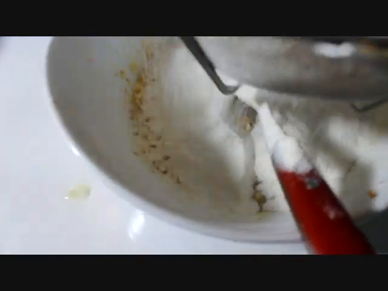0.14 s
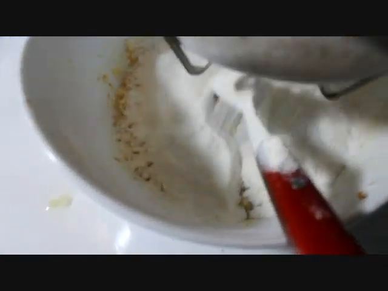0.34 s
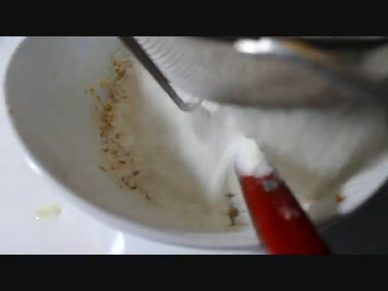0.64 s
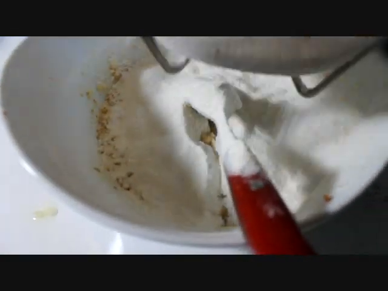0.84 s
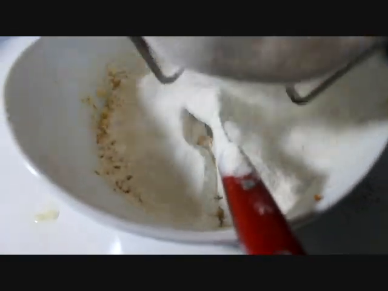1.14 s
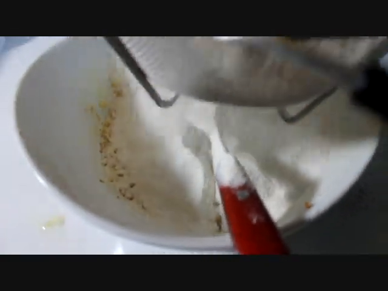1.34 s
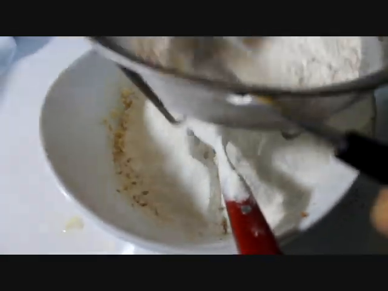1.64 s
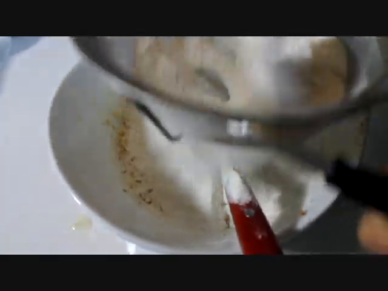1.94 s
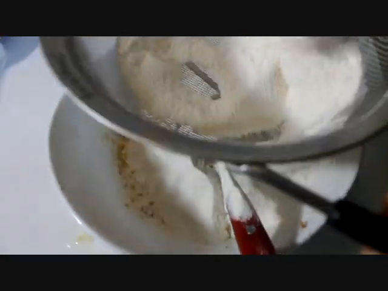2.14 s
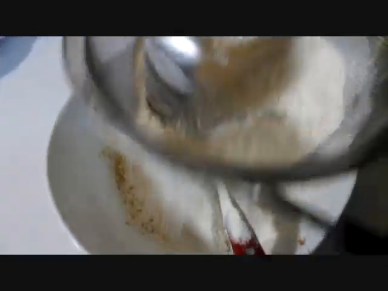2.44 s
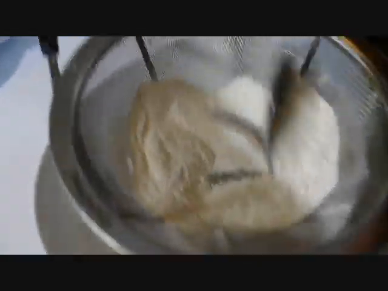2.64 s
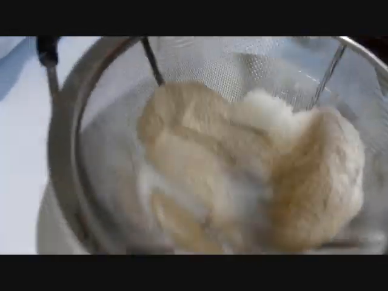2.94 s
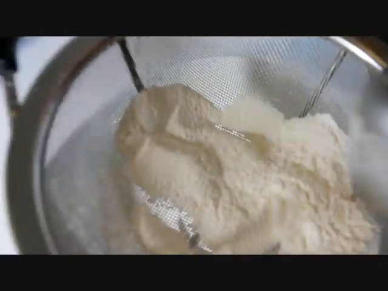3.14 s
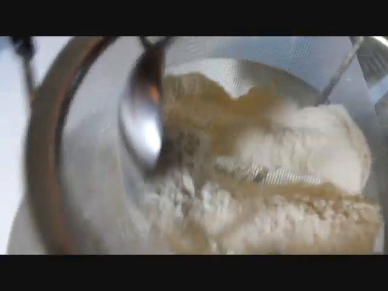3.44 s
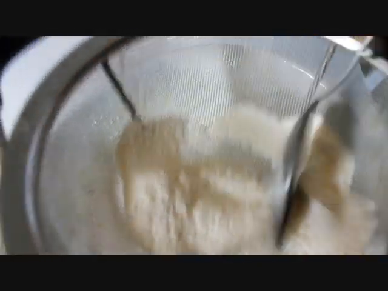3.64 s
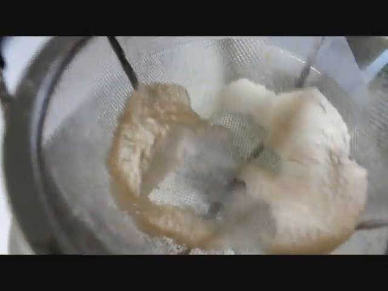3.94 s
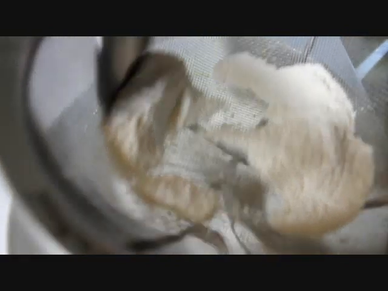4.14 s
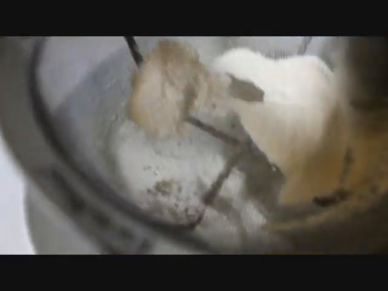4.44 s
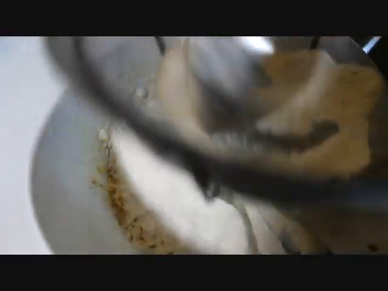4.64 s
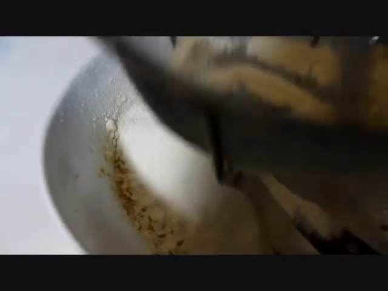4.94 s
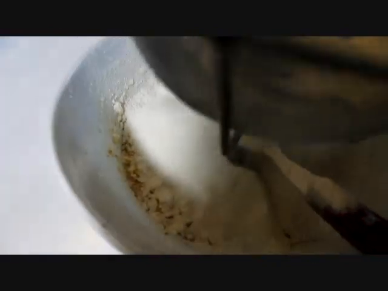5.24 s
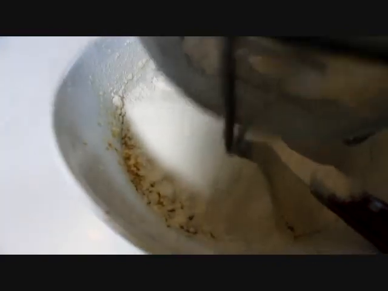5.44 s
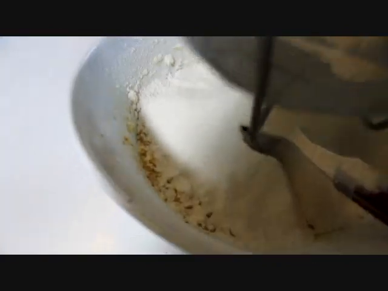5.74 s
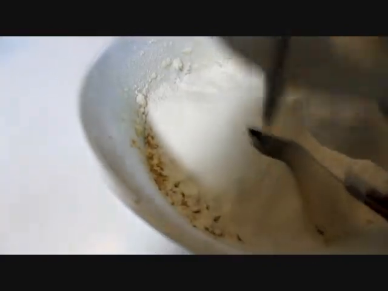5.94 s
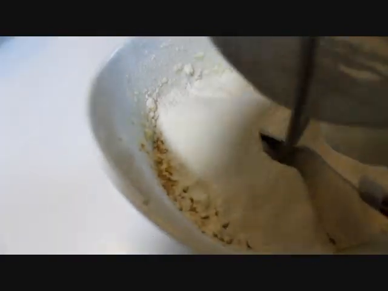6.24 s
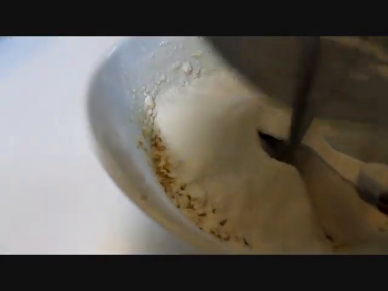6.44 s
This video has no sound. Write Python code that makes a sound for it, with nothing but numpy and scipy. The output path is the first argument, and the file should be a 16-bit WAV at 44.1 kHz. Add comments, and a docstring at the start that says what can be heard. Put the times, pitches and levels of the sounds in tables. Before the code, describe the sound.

Close to the microphone, a metal utensil drags flour across a wire mesh sieve in short, quick rasps. Uneven, lighter scrapes come first, then firmer regular strokes, with clicks as the edge lands and brief buzzes as it crosses the wires. The later strokes turn thinner and brighter. A small kitchen adds faint echo, room noise and a low appliance hum.

```python
"""Small kitchen, microphone close to a wire sieve; room noise and an appliance hum lie behind throughout.
From the start a steel utensil scrapes flour in quick strokes: its edge plucks the wires in random ticks,
which shake the resonances of mesh, bowl and steel. Taps, short buzzes and faint echoes join at once.
Faint narrow hisses fill some pauses from 1.8 s. The top fizz grows until 3.5 s and later eases;
the motor note dips at first and is strongest at the end."""
import sys
import numpy as np
from scipy import signal
from scipy.fft import rfft, irfft
from scipy.io import wavfile
from scipy.ndimage import uniform_filter1d

SR = 44100
rng = np.random.default_rng(int(sys.argv[2]) if len(sys.argv) > 2 else 0)


def unload_wav(signal):
    """Save mono or channel-first audio to the path in sys.argv[1] as 16-bit WAV at rate SR, clipped to [-1, 1]."""
    wavfile.write(
        sys.argv[1],
        SR,
        np.round(np.clip(np.atleast_2d(signal).T, -1, 1) * 32767).astype(np.int16),
    )


def volts_from_decibels(level):
    """Turn decibel levels (scalar or array-like) into linear amplitude factors."""
    exponent = np.asarray(level, float) / 20
    return 10 ** exponent


N = 291060
SECONDS = np.arange(N) / SR
COARSE_STEP = 32  # samples between points of the stroke levels
COARSE_SECONDS = np.arange(0, N + COARSE_STEP, COARSE_STEP) / SR


def evened(x):
    """Scales to rms 1."""
    return x / np.sqrt(np.mean(x ** 2) + 1e-20)


def curve(points, t):
    """Reads a (time, level) table with straight lines between its points."""
    return np.interp(t, *np.transpose(points))


def read(points, hz):
    """Reads a spectrum on a log-frequency axis."""
    f, value = np.transpose(points)
    return np.interp(np.log(hz + 1), np.log(f + 1), value)


def resonate(x, hz, width):
    """One resonance of gain 1 at its centre: a decaying complex rotation."""
    r = np.exp(-np.pi * width / SR)
    return 2 * signal.lfilter([1 - r], [1, -r * np.exp(2j * np.pi * hz / SR)], x).real


def wander(seconds):
    """Slow chance of rms 1 that changes over the given time."""
    size = max(int(seconds * SR), 2)
    smooth = uniform_filter1d(rng.standard_normal(N), size)
    return evened(uniform_filter1d(smooth, size))


def body(x, level, modes):
    """Broad resonances, each passed twice for steep skirts, that swell and fade as the edge moves."""
    swells = [volts_from_decibels(2 * wander(0.013)) for _ in modes]  # 2 dB rms

    def ring(drive):
        total = 0
        for k, (hz, width, db) in enumerate(modes):
            tone = resonate(resonate(drive, hz, width), hz, width)
            total = total + (-1) ** k * volts_from_decibels(db) * swells[k] * tone
        return total

    return ring(x * level) / ring(x).std()


# room noise: (frequency [Hz], relative density [dB])
AIR_SPECTRUM = [(18, -55), (30, -33), (184, 17.5), (740, 10), (988, 7.5), (1810, 3), (2060, 5.5),
                (4300, 2.5), (6720, -6), (8980, -4.5), (12000, -25), (13700, -16), (16000, -25)]
# appliance tones: (frequency [Hz], width of each pass [Hz], level [dB])
HUM_TONES = [(60.3, 8.5, -72.5), (115.3, 22, -63.5), (153, 7.3, -61.5), (193.3, 5.7, -58), (403, 12, -83)]
# motor note before its wavering: (time [s], level [dB])
MOTOR_LEVEL = [(0, -58.5), (2.4, -64), (3.0, -58.5), (6.6, -53.5)]


def background():
    """Steady shaped noise, wavering tones of an appliance and one motor note that dips, then grows."""
    hz = np.fft.rfftfreq(N, 1 / SR)
    air = evened(irfft(rfft(rng.standard_normal(N)) * volts_from_decibels(read(AIR_SPECTRUM, hz)), N))
    shake = rng.standard_normal(N)
    hum = sum(volts_from_decibels(db) * evened(resonate(resonate(shake, f, w), f, w)) for f, w, db in HUM_TONES)
    motor_db = curve(MOTOR_LEVEL, SECONDS) + 0.5 * wander(0.069)
    motor = volts_from_decibels(motor_db) * np.sqrt(2) * np.sin(2 * np.pi * 246.7 * SECONDS)
    return volts_from_decibels(-49) * air + hum + motor


# strokes of the edge over the mesh:
# (fullest contact [s], pressure [dB], swell [s], fade [s], bowl boom against the pressure [dB])
EDGE_STROKES = [(0.025, -25, 0.037, 0.072, -4), (0.126, -32.5, 0.006, 0.031, -0.5),
                (0.188, -37.3, 0.061, 0.07, -4.5), (0.269, -26, 0.054, 0.029, -1.5),
                (0.344, -22, 0.047, 0.019, -4.5), (0.498, -38.5, 0.0056, 0.3, -5),
                (0.597, -25, 0.026, 0.013, -8), (0.664, -25, 0.13, 0.12, -3),
                (0.709, -26, 0.017, 0.015, -2), (0.784, -34.5, 0.22, 0.0083, -5.5),
                (1.021, -37, 0.048, 0.012, -4), (1.08, -17.5, 0.056, 0.088, -14.5),
                (1.148, -34, 0.0052, 0.15, -4.5), (1.261, -20, 0.042, 0.1, -13),
                (1.382, -22.5, 0.036, 0.095, -9.5), (1.512, -18, 0.045, 0.07, -12.5),
                (1.65, -22, 0.07, 0.042, -9), (1.708, -42.1, 0.006, 0.1, -4.5),
                (1.713, -36.6, 0.046, 0.011, -7), (1.917, -36, 0.034, 0.163, -4),
                (1.996, -22, 0.09, 0.22, -5.5), (2.101, -30.5, 0.18, 0.014, -3.5),
                (2.303, -31.5, 0.023, 0.12, -7.5), (2.35, -25.5, 0.034, 0.044, -9),
                (2.387, -31, 0.07, 0.011, -8), (2.513, -38, 0.006, 0.28, -8),
                (2.597, -33.5, 0.028, 0.097, -8), (2.67, -18.0, 0.049, 0.094, -19),
                (2.733, -29, 0.006, 0.078, -12), (3.038, -18.5, 0.026, 0.09, -11.5),
                (3.109, -25, 0.065, 0.015, -9.5), (3.296, -34, 0.0069, 0.043, -0.5),
                (3.374, -19, 0.077, 0.045, -10.5), (3.542, -32.5, 0.0088, 0.071, -12),
                (3.646, -18, 0.055, 0.034, -18), (3.7, -20, 0.034, 0.078, -14),
                (3.824, -21.5, 0.04, 0.073, -17), (3.962, -19.5, 0.062, 0.052, -17),
                (4.071, -16.5, 0.044, 0.051, -31), (4.272, -31, 0.0085, 0.022, -13.5),
                (4.381, -17.5, 0.044, 0.022, -15.5), (4.436, -23, 0.037, 0.074, -14),
                (4.503, -34.8, 0.25, 0.0054, -6.5), (4.632, -27.5, 0.0085, 0.12, -10.5),
                (4.709, -22, 0.078, 0.016, -19), (4.732, -25.5, 0.054, 0.021, -14.6),
                (4.901, -30.5, 0.035, 0.217, -13), (4.973, -19, 0.074, 0.042, -32),
                (5.109, -18.8, 0.04, 0.062, -35), (5.237, -22.1, 0.081, 0.051, -19),
                (5.361, -19.5, 0.059, 0.05, -20), (5.467, -19, 0.058, 0.031, -28),
                (5.72, -20.5, 0.038, 0.012, -33), (5.787, -19, 0.074, 0.05, -38),
                (6.052, -34.5, 0.055, 0.006, -12), (6.114, -20, 0.077, 0.02, -31),
                (6.146, -26, 0.01, 0.021, -31), (6.218, -31.5, 0.046, 0.0099, -23),
                (6.304, -20, 0.069, 0.071, -28), (6.339, -23.8, 0.0078, 0.011, -16),
                (6.458, -20, 0.048, 0.052, -23), (6.557, -22.5, 0.054, 0.058, -18)]
# the edge leaves the mesh: (time [s])
EDGE_LIFTS = [.36, .788, 1.678, 2.113, 2.395, 3.125, 3.415, 4.12, 4.505, 4.75, 5.487, 6.125, 6.6]
ARCH = 1.82  # shape of a stroke: 1 = pointed, 2 = round
LIFT_DB_PER_S = 900  # a stroke still fading is cut short


def contact():
    """Power of each stroke: 20 dB over the swell and the fade, ended quickly when the edge lifts."""
    s, pressure_db, swell, fade, _ = np.transpose(EDGE_STROKES)[:, :, None]
    t = COARSE_SECONDS
    part = np.where(t < s, (s - t) / np.maximum(swell, .003), (t - s) / np.maximum(fade, .003))
    arch_db = 20 * np.minimum(part, 10) ** ARCH
    lift = np.take(EDGE_LIFTS, np.searchsorted(EDGE_LIFTS, s), mode="clip")  # next lift after the stroke
    lift_db = LIFT_DB_PER_S * np.clip(t - lift, 0, .2)
    return volts_from_decibels(pressure_db - arch_db - lift_db) ** 2


# flour drag against the pressure: (time [s], level [dB])
FLOUR_LEVEL = [(0, -3), (.35, 0), (.7, -1), (1.05, -4), (1.4, -5.5), (1.65, -3.5), (2.0, -2), (2.35, -6),
               (2.7, -4), (3.05, -3.5), (3.4, -5), (3.7, -3.5), (3.9, -5.5), (4.4, -3), (4.9, -5),
               (5.4, -5.5), (5.8, -6.5), (6.3, -5.5), (6.6, -5)]
# bare wires against the pressure: (time [s], level [dB])
BARE_WIRE_LEVEL = [(0, -4), (.35, -1), (.7, -3.5), (1.0, -0.5), (1.6, -2), (1.9, -5), (2.4, -8.5),
                   (2.7, -4), (3.1, -7.5), (3.6, -6), (4.0, -5.5), (4.4, -3.5), (4.7, -4), (4.9, 0),
                   (5.4, -0.5), (5.8, 0.5), (6.2, 0.5), (6.6, 1.5)]
# steel ring against the pressure: (time [s], level [dB])
STEEL_LEVEL = [(0, -15), (.9, -17), (1.01, 3), (1.07, -18), (1.7, -11), (2.0, -9), (2.4, -15), (2.6, 0),
               (2.7, -15), (3.1, -25), (3.37, -15), (3.5, -16), (3.55, 9), (3.6, -24), (4.4, -27),
               (4.7, -13), (5.3, -21), (5.65, -14), (5.71, -6), (5.8, -26), (6.1, -10), (6.3, -18),
               (6.44, -4), (6.6, -23)]
# trickle in mesh, bowl, flour drag, bare wires, steel, against the pressure: (level [dB])
TRICKLE_LEVELS = (-17.5, -19.5, -14.5, -19.5, -44)
FIRM_DB = -28  # pressure at which the three slopes below change nothing
BOOM_PER_DB, DRAG_PER_DB, RING_PER_DB = -0.14, -0.16, -0.1  # growth held back [dB per dB of pressure]
TRICKLE_T60 = 0.27  # s


def pressing():
    """Levels that drive mesh, bowl, flour drag, bare wires and steel; flour trickles on after the edge."""
    power = contact()
    whole = power.sum(0)
    over_db = 10 * np.log10(whole + 1e-7) - FIRM_DB
    keep = volts_from_decibels(-120 * COARSE_STEP / SR / TRICKLE_T60)  # power, hence 120
    trickle = signal.lfilter([1 - keep], [1, -keep], whole)
    flour, treble, steel = (volts_from_decibels(curve(points, COARSE_SECONDS)) ** 2
                            for points in (FLOUR_LEVEL, BARE_WIRE_LEVEL, STEEL_LEVEL))
    boom = volts_from_decibels(np.transpose(EDGE_STROKES)[4]) ** 2 @ power
    parts = [whole,
             boom * volts_from_decibels(BOOM_PER_DB * over_db) ** 2,
             whole * flour * volts_from_decibels(DRAG_PER_DB * over_db) ** 2,
             whole * treble,
             whole * steel * volts_from_decibels(RING_PER_DB * over_db) ** 2]
    return [np.interp(SECONDS, COARSE_SECONDS, np.sqrt(part + volts_from_decibels(db) ** 2 * trickle))
            for part, db in zip(parts, TRICKLE_LEVELS)]


def ticks():
    """Wires let go one after another, about 9000 a second, in clumps where the edge chatters."""
    size = volts_from_decibels(0.5 * np.minimum(rng.exponential(1, N), 5)) * rng.choice([-1., 1.], N)
    plucked = rng.random(N) < 9000 / SR
    return evened(size * plucked * volts_from_decibels(wander(.003)))  # clumps vary by 1 dB rms


# colour of the singing wires: (frequency [Hz], relative level [dB])
PING_SPECTRUM = [(700, -20), (1500, -6), (3000, -0.5), (4300, 1.5), (6500, -4.5), (8800, -17), (10500, -1)]


def pings(level):
    """Single wires, plucked hard enough to sing, each ring some cycles on their own pitch."""
    pitches = np.geomspace(700, 10500, num=48) * rng.uniform(0.956, 1.03, size=48)
    plucks = (rng.random(N) < 500 / SR) * volts_from_decibels(4.7 * np.minimum(rng.exponential(1, N), 3))
    which = rng.integers(0, len(pitches), N)

    def ring(drive):
        total = 0
        for k, hz in enumerate(pitches):
            total = total + volts_from_decibels(read(PING_SPECTRUM, hz)) * resonate(drive * (which == k), hz, hz / 22)
        return total

    return volts_from_decibels(-7) * ring(plucks * level) / ring(plucks).std()


# resonances of mesh, flour drag, bowl, knocked rim, bare wires and top fizz:
# (frequency [Hz], width of each pass [Hz], relative level [dB])
MESH_MODES = [(3614, 820, 1), (4170, 1070, 5), (5614, 1780, -2)]
DRAG_MODES = [(1675, 433, -4.5), (2085, 415, 2.5), (2562, 530, -1.5), (3042, 430, 4.5)]
BOWL_MODES = [(478, 486, -9), (710, 160, 0), (968, 275, 3.5), (1426, 440, 6)]
RIM_KNOCK_MODES = [(350, 500, 0), (1000, 900, 0)]
WIRE_MODES = [(7280, 2600, 4), (8800, 2000, 8.5), (10090, 1560, 1)]
FIZZ_MODES = [(11040, 1650, 0), (12600, 1360, -0.5), (13900, 1460, -1), (15300, 1300, -4)]
# lower and upper ring of the steel, then the hoop: (frequency [Hz], width [Hz], relative level [dB])
STEEL_MODES = [(13635, 65, -2), (15565, 70, -12)]
HOOP_MODE = (2110, 10, -24)
# top fizz against the bare wires: (time [s], relative level [dB])
FIZZ_LEVEL = [(0, -13), (1, -10), (1.5, -10), (2.0, -7), (2.3, -4), (2.65, -4.5), (3.1, -4), (3.5, -1),
              (4.5, -1), (5.5, -4), (6.6, -6.5)]
# upper steel ring against the lower: (time [s], relative level [dB])
UPPER_STEEL_LEVEL = [(0, -3), (2.6, -3), (2.66, 7), (2.75, -4), (5.5, -3), (5.7, 8), (6.1, -4), (6.2, 9),
                     (6.4, 4), (6.6, 9)]


def scrape(touch, boom, drag, bright, ring):
    """The same ticks shake the mesh, its bowl, the flour, the bare wires, the hoop and the steel."""
    tap, thud, snap, chime = blows()
    wire = ticks()
    wire[[round(row[0] * SR) + 22 for row in EDGE_TAPS]] = 2.5  # first contact is one hard click
    out = body(wire, touch + 0.22 * tap, MESH_MODES)
    out += body(wire, drag + 0.15 * tap, DRAG_MODES)
    out += body(wire, boom + 0.067 * tap, BOWL_MODES)
    out += body(wire, 0.68 * thud, RIM_KNOCK_MODES)
    out += body(wire, bright + 0.37 * snap, WIRE_MODES)
    out += pings(touch)
    out += body(wire, volts_from_decibels(curve(FIZZ_LEVEL, SECONDS)) * (bright + 0.48 * snap), FIZZ_MODES)
    lower = ring + 0.11 * snap
    upper = ring * volts_from_decibels(curve(UPPER_STEEL_LEVEL, SECONDS)) + 12.4 * chime
    for (hz, width, db), level in zip([*STEEL_MODES, HOOP_MODE], [lower, upper, drag]):
        out += volts_from_decibels(db) * resonate(wire * level, hz, width) / resonate(wire, hz, width).std()
    return out


# decay of the kitchen: (frequency [Hz], time to fall 60 dB [s])
ROOM_DECAY = [(300, 0.86), (2000, 0.17), (6000, 0.46), (14000, 0.28)]


def kitchen(x):
    """Sparse reflections of random sign, each band dying at its own speed."""
    taps = np.zeros(SR // 2)
    at = np.arange(200, len(taps) - 20, 20)
    taps[at + rng.integers(0, 20, len(at))] = rng.choice([-1., 1.], len(at))
    hz, t, z = signal.stft(taps, SR, nperseg=256)
    decay = volts_from_decibels(-60 * t / read(ROOM_DECAY, hz)[:, None])
    tail = signal.istft(z * decay, SR, nperseg=256)[1]
    return volts_from_decibels(-20) * signal.fftconvolve(x, tail / np.linalg.norm(tail))[:N]


# the edge lands or snags on the mesh: (time [s], relative peak [dB], thud against the peak [dB],
# brightness against the peak [dB], time for the rattle to fall 60 dB [s])
EDGE_TAPS = [(0.1229, -12, -4.5, -6, 0.014), (0.4936, -19.5, -8.5, -8, 0.013),
             (0.5839, -2.5, -28, -13, 0.026), (0.62, -5.5, -35, -16, 0.034), (0.948, -14.5, -11, -1, 0.015),
             (0.9822, -28, -23, -1, 0.016), (1.0431, 2.5, -37, -15, 0.013), (1.0617, -12, -39, -16, 0.012),
             (1.441, -16, -35, -1, 0.015), (1.6003, -15, -29, -2, 0.03), (1.7392, -8.5, -35, -6.5, 0.052),
             (1.8417, -28, -25, -8, 0.026), (2.276, -4.5, -31, -15, 0.031), (2.294, -21, -16, -9, 0.02),
             (2.5098, -22, -26, -17, 0.017), (2.5466, -19, -30, -6, 0.018), (2.6197, -12, -35, -13, 0.013),
             (2.637, -12, -37, -10, 0.0073), (2.6424, 3.5, -36, -6.5, 0.0087),
             (2.9288, -14, -12, -10, 0.029), (3.016, -19, -27, -13, 0.018), (3.058, -3, -35, -8, 0.016),
             (3.2717, 0, -21, -19, 0.012), (3.292, -24, -35, -6, 0.022), (3.535, -22.5, -31, -5, 0.055),
             (3.609, 3.5, -26, -26, 0.011), (4.2421, -19, -9, -12, 0.058), (4.2692, -20, -33, -12, 0.025),
             (4.342, -10, -37, -17, 0.018), (4.3545, -27, -22, -5, 0.02), (4.499, -29, -35, -3, 0.018),
             (4.6132, -3.5, -37, -16, 0.025), (4.8487, -12, -45, -8.5, 0.035),
             (4.8777, -21, -31, -13, 0.049), (5.25, -10.5, -33, -2, 0.018), (5.53, -21.5, -35, -4, 0.041),
             (5.6526, -13, -30, -4.5, 0.024), (5.687, -2.5, -45, -16, 0.024),
             (5.9908, -8.5, -16.5, -0.5, 0.024), (6.1443, -32, -42, -7, 0.022),
             (6.4208, -9.5, -30, -12, 0.025), (6.5124, -14.5, -39, 6, 0.013)]
# steel struck squarely: (time [s], relative peak [dB])
STEEL_CLINKS = [(5.687, -17), (6.1443, -13)]


def blows():
    """Levels of the short rattle after each tap: whole, thud, treble and upper steel ring."""
    levels = np.zeros((4, N))
    t = np.arange(SR // 10) / SR
    rise = np.minimum(t / .0005, 1)
    for s, peak_db, thud_db, snap_db, rattle in EDGE_TAPS:
        shape = volts_from_decibels(peak_db - 60 * t / max(rattle, .004)) * rise
        at = round(s * SR)
        shares = volts_from_decibels(np.array([0, thud_db, snap_db, -44]))
        levels[:, at:at + len(t)] += shares[:, None] * shape[:N - at]
    for s, peak_db in STEEL_CLINKS:
        levels[3, round(s * SR):][:len(t)] += volts_from_decibels(peak_db - 60 * t / 0.022) * rise
    return levels


# the edge crosses the wires in step: (fastest moment [s], lead [s], trail [s],
# wires crossed at the fastest [Hz], slowing [Hz per s], relative level [dB])
WIRE_ZIPS = [(.127, .002, .03, 480, 7000, -42), (.712, .002, .036, 450, 6500, -42),
             (1.096, .006, .06, 680, 8000, -43), (1.257, .004, .062, 590, 4300, -42),
             (1.41, .018, .04, 560, 8000, -41), (1.505, .005, .04, 560, 3200, -45),
             (1.652, .01, .036, 520, 6000, -45), (1.985, .05, .002, 667, 7000, -49),
             (2.695, .002, .07, 390, 1500, -49), (3.36, .03, .04, 735, 1800, -40),
             (3.825, .03, .03, 610, 5000, -45), (3.961, .036, .034, 590, 4800, -48),
             (4.07, .015, .036, 720, 6500, -43), (4.7, .055, .045, 635, 2000, -48),
             (4.975, .045, .03, 740, 5000, -52), (5.103, .01, .048, 710, 5700, -44),
             (5.215, .015, .025, 480, 3000, -48), (5.345, .01, .045, 710, 5700, -47),
             (5.468, .028, .022, 735, 7000, -47), (5.765, .04, .002, 545, 3300, -46),
             (5.79, .015, .03, 780, 8000, -46), (6.115, .05, .005, 755, 5000, -47),
             (6.29, .035, .002, 520, 3000, -50), (6.305, .002, .03, 880, 8500, -43)]
# overtones of the buzz: (multiple, relative level [dB])
BUZZ_OVERTONES = [(1, 2.5), (2, 1), (3, -8), (4, 0)]


def zips():
    """Evenly spaced wires buzz briefly, the pitch dropping away on both sides of the fastest moment."""
    out = np.zeros(N)
    unsteady = 1 + 0.0396 * wander(0.0042)
    turnover = .005  # s, rounds the peak of the speed
    for s, lead, trail, hz, slowing, db in WIRE_ZIPS:
        at = np.arange(round((s - lead) * SR), round((s + trail) * SR))
        speed = hz - slowing * (np.hypot(at / SR - s, turnover) - turnover)
        turns = np.cumsum(np.maximum(speed, 100) * unsteady[at]) / SR
        buzz = sum(volts_from_decibels(d) * np.sqrt(2) * np.sin(2 * np.pi * k * turns) for k, d in BUZZ_OVERTONES)
        out[at] += buzz * volts_from_decibels(db) * signal.windows.tukey(len(at), .5)
    return out


# faint hisses between strokes: (time [s], length [s], level at the fullest [dB])
PAUSE_MURMURS = [(1.76, .14, -50), (2.43, .09, -51), (2.78, .1, -55), (5.5, .16, -55)]


def murmurs():
    """Narrow noise near the pitch of the hoop comes and goes in some pauses."""
    level = np.zeros(N)
    for s, length, db in PAUSE_MURMURS:
        size = round(length * SR)
        level[round(s * SR):][:size] += volts_from_decibels(db) * np.hanning(size)
    return level * evened(resonate(rng.standard_normal(N), 2110, 45))


def scene():
    """Sieve, its echo in the kitchen and the background."""
    sieve = scrape(*pressing()) + zips() + murmurs()
    return (sieve + kitchen(sieve) + background())[None]


def top_cut(x):
    """Nothing passes above the cut-off."""
    return signal.sosfilt(signal.butter(12, 16950, fs=SR, output="sos"), x)


def record(dry):
    """Deep bass is thinned gently; above a sharp edge at 15850 Hz the treble falls by 40 dB."""
    thin = signal.sosfilt(signal.butter(1, 60, "high", fs=SR, output="sos"), dry)
    lowpass = signal.firwin(301, 15850, window=("kaiser", 7), fs=SR)
    band = signal.oaconvolve(thin, lowpass[None], "same")
    finished = band + volts_from_decibels(-40) * (thin - band)
    return top_cut(finished)


dry = scene()
out = record(dry)
unload_wav(out)
```